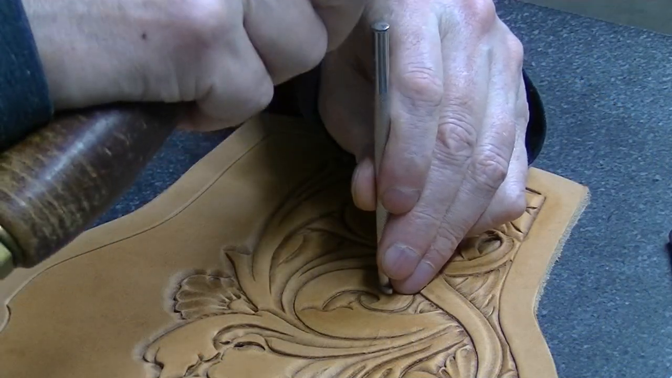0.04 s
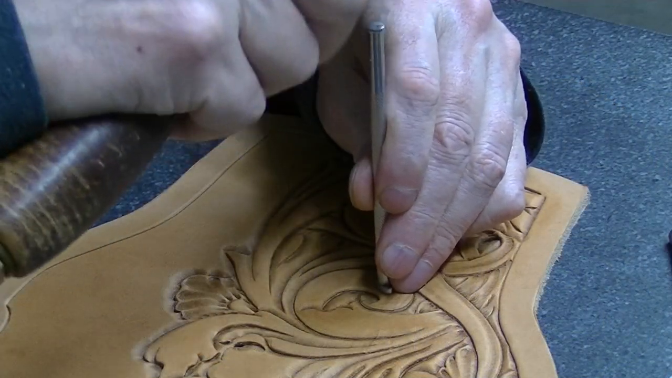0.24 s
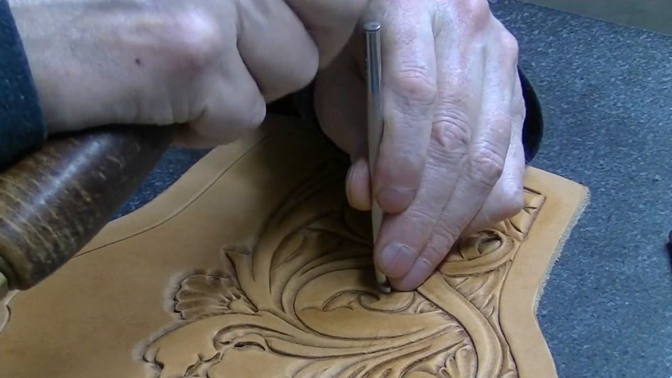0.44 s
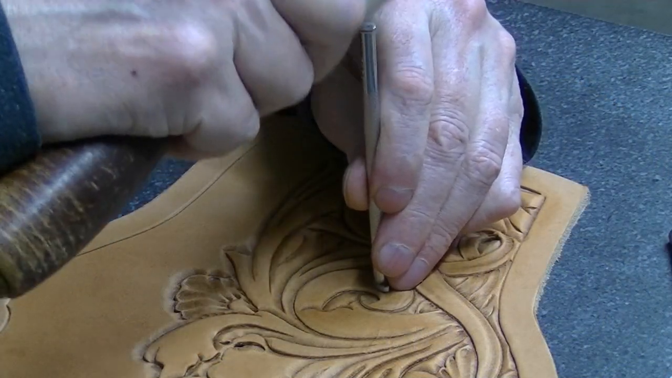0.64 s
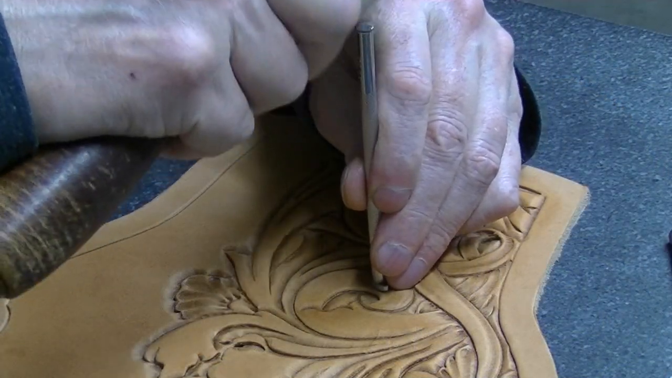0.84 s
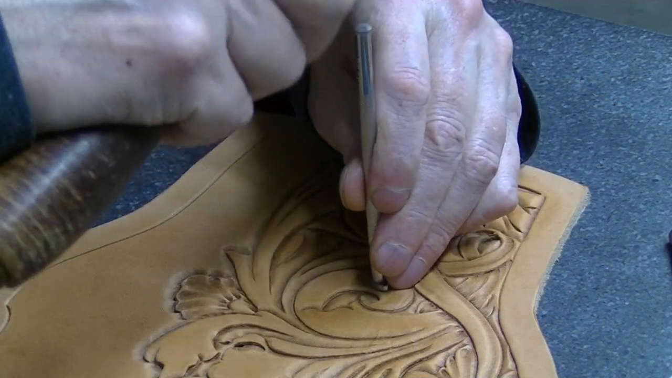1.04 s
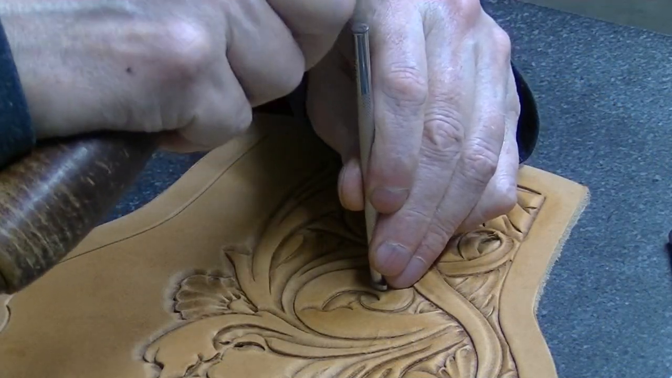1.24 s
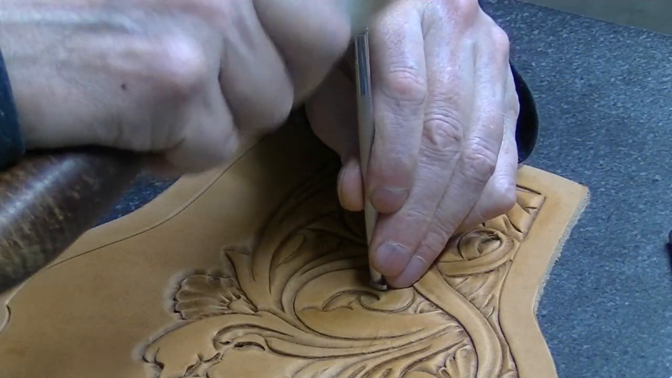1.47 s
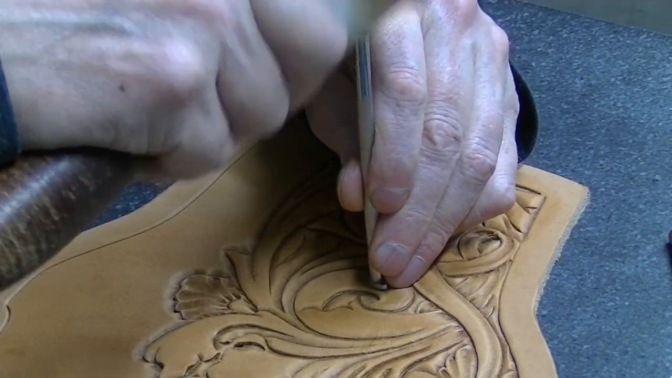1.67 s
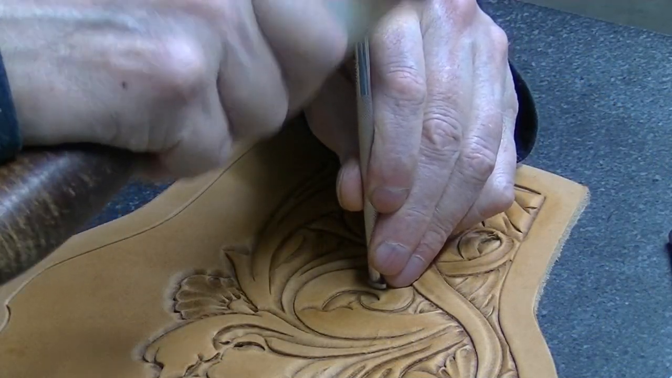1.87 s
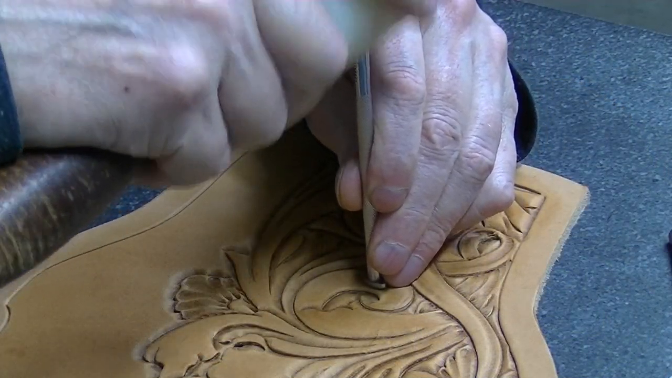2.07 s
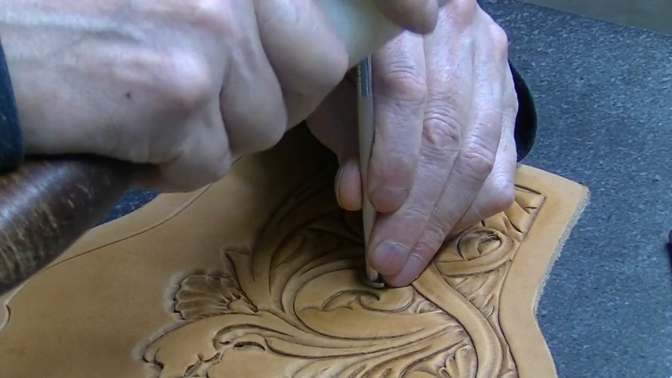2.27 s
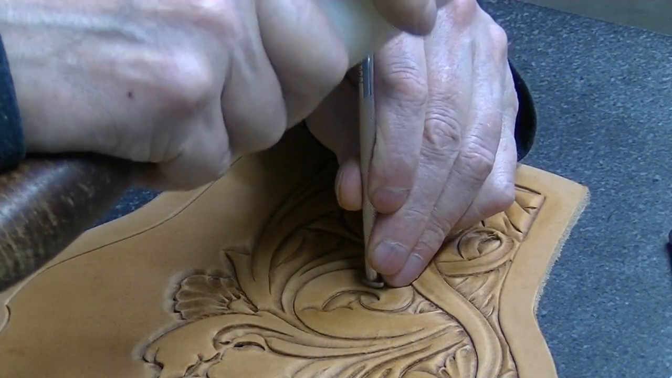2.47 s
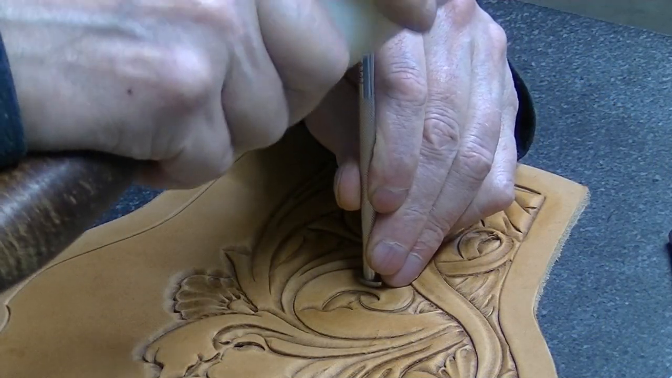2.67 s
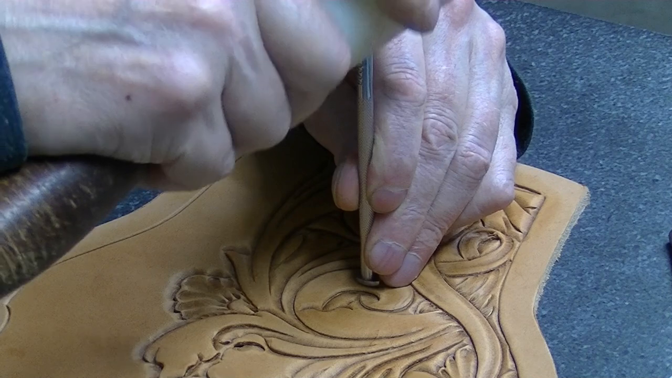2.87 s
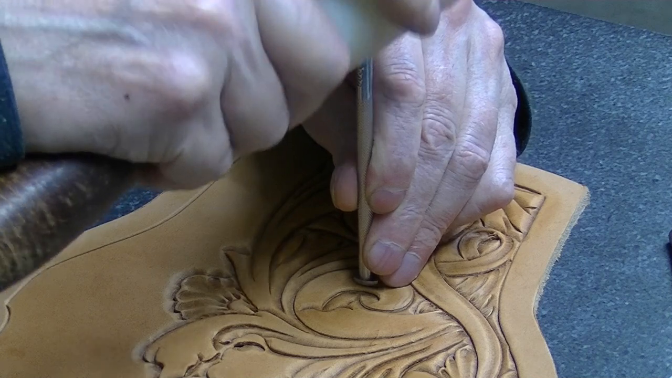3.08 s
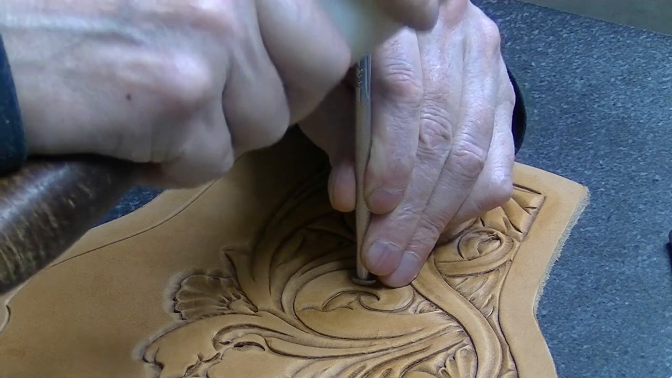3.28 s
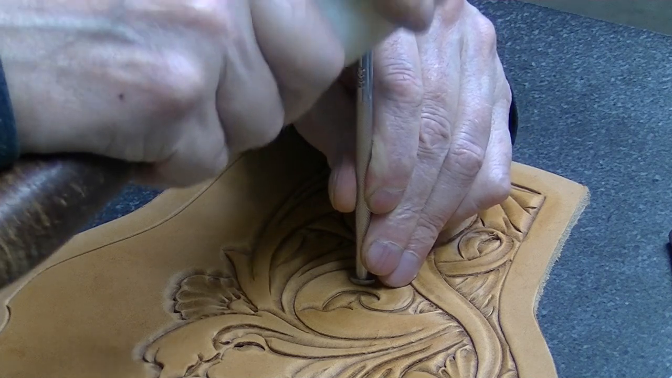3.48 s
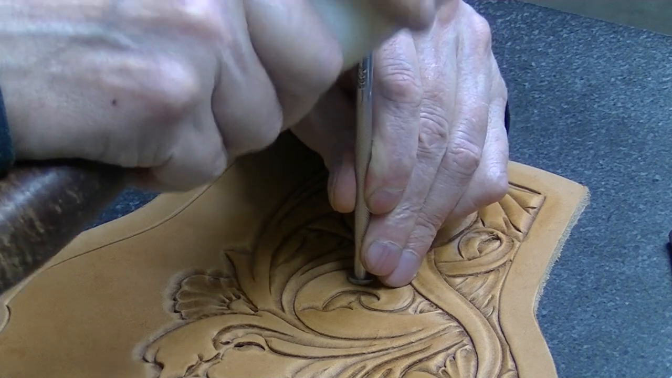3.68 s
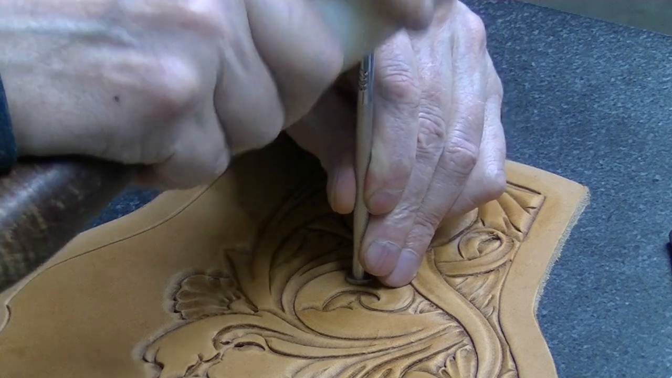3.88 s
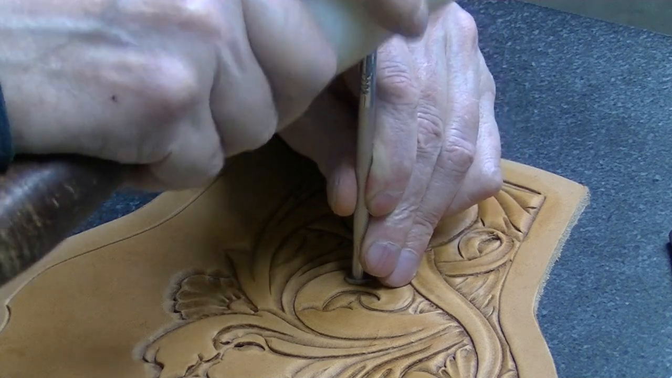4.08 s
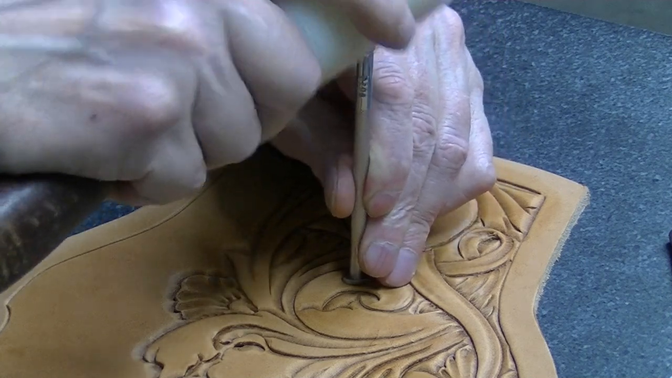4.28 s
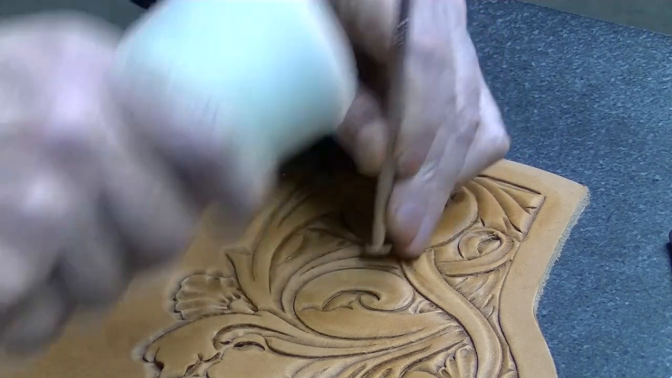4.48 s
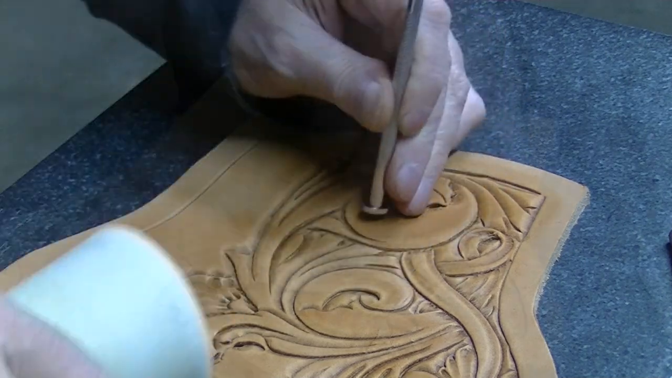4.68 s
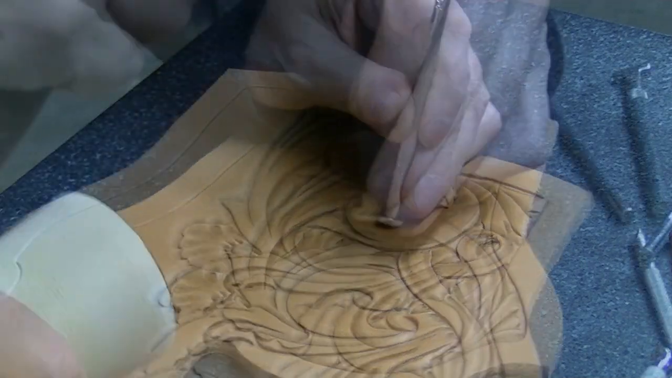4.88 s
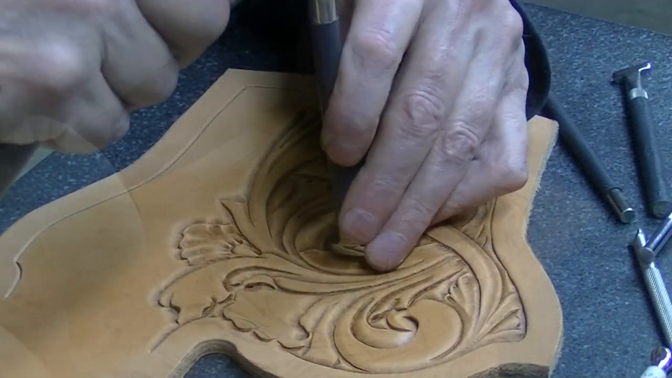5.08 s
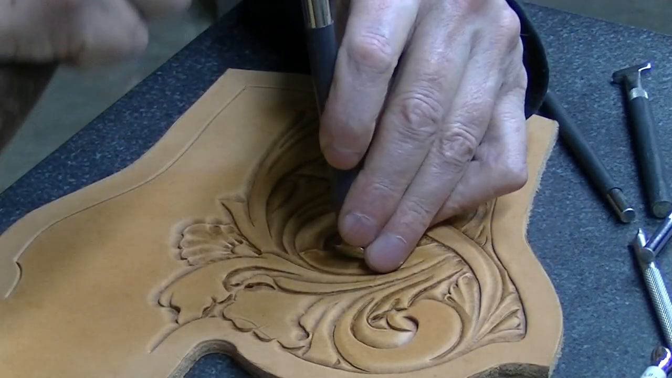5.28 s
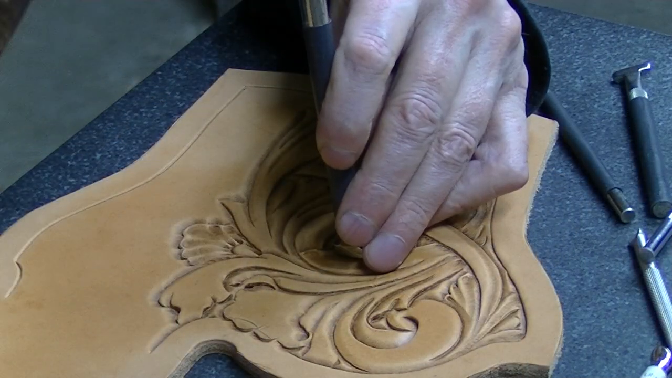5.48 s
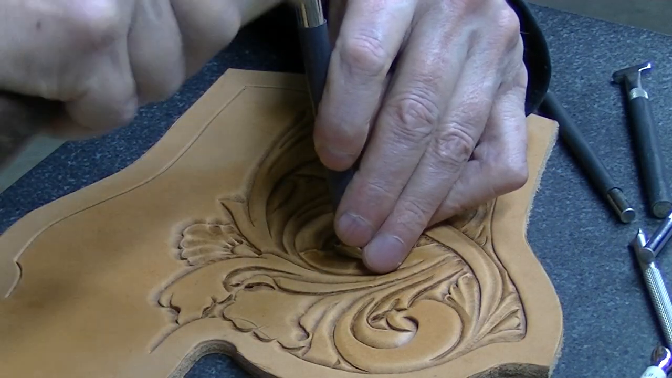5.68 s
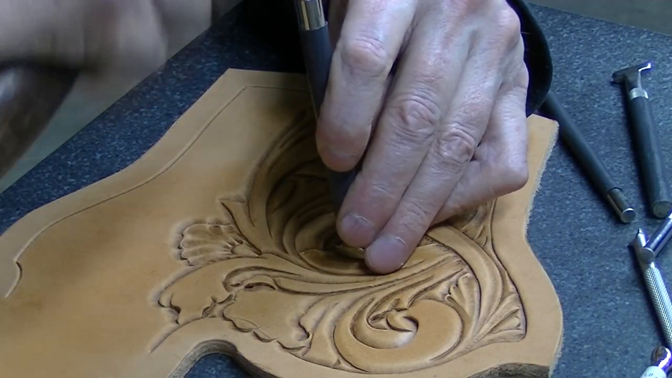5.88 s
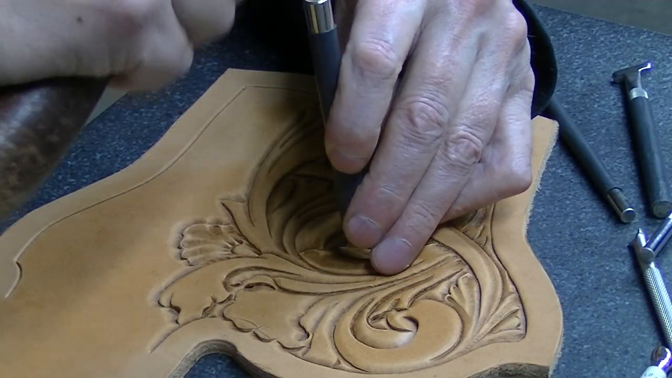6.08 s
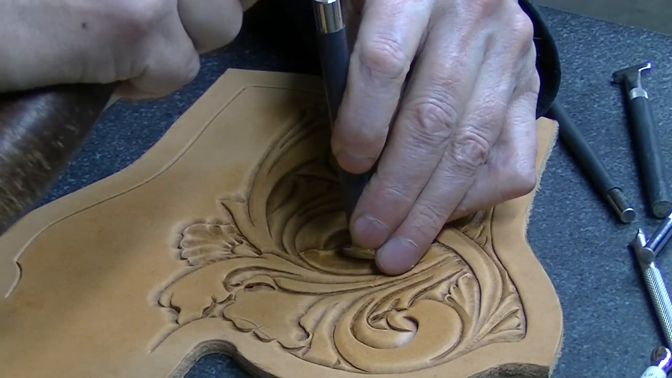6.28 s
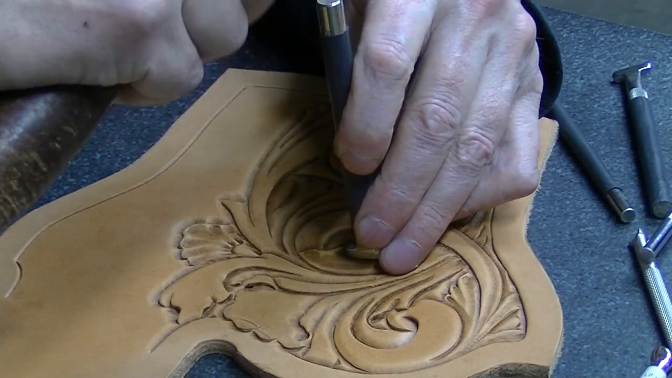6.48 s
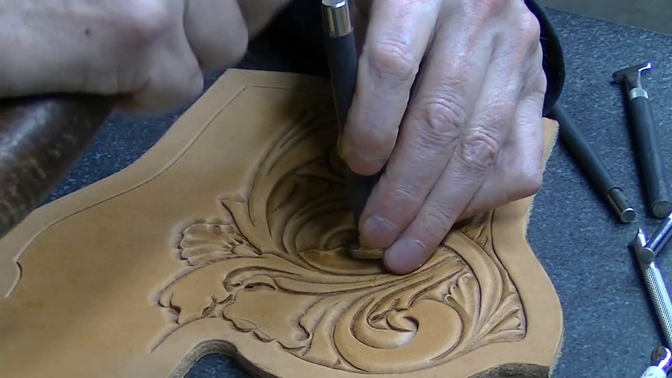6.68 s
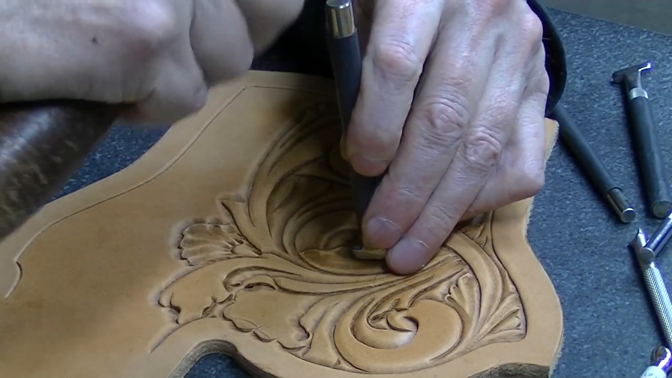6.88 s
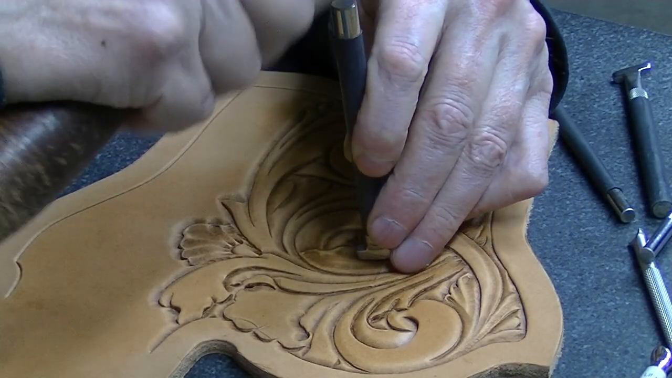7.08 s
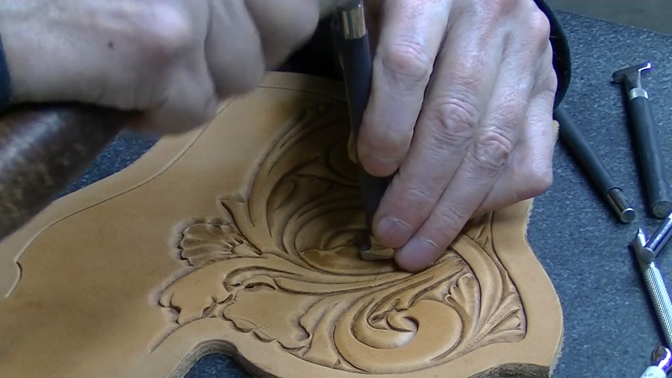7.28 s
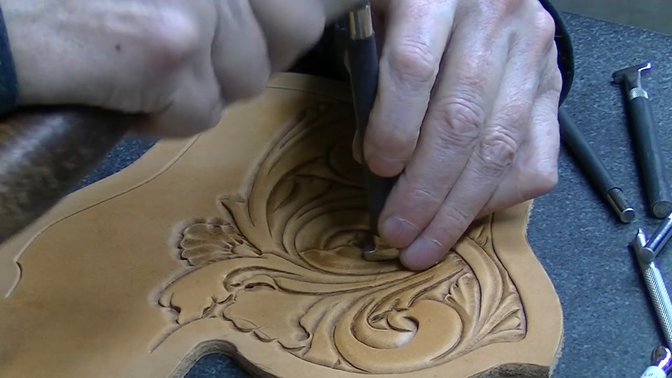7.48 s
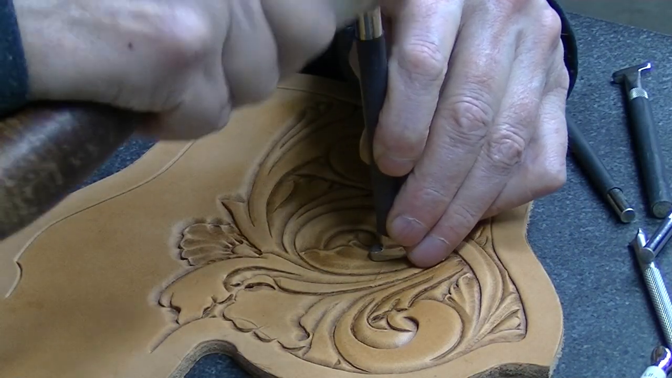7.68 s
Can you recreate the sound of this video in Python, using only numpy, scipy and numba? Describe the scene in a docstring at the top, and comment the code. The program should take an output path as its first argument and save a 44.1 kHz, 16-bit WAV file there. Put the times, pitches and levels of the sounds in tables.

```python
"""A small, bare workshop with a leather carver at the bench: a plastic mallet taps a slim steel stamp in an
even run, then, after a pause, hits a broader one harder. Damped sines ring stamp, mallet head and bench;
noise bursts crack and crunch; echoes, a diffuse tail and low standing waves make the room.
Far off, a machine hums in two wavering tones; near by lie room air, a sliding hand and light touches.
The camera's limiter ducks on loud clacks, then lets the room rise as its gain creeps back."""
import sys
import numpy as np
from scipy import signal
from scipy.fft import rfft, irfft, next_fast_len
from scipy.io import wavfile
from numba import njit

SR = 44100
rng = np.random.default_rng(int(sys.argv[2]) if len(sys.argv) > 2 else 0)


def bounce(signal):
    """Save signal as a 16-bit WAV file at the path given by the first command-line argument."""
    frames = np.transpose(np.atleast_2d(signal))
    limited = np.clip(frames, -1, 1)
    pcm = np.round(limited * 32767).astype(np.int16)
    wavfile.write(sys.argv[1], SR, pcm)


N = 341334
LEAD = SR // 4  # a quarter second of run-up, cut off at the end
TOTAL = N + LEAD
TIME = (np.arange(TOTAL) - LEAD) / SR  # s
AGE = np.arange(int(.7 * SR)) / SR  # s since an impact

# All levels in these tables are relative; each sound is trimmed further where it is mixed.
# blows on the slim stamp, the first just before the start:
# [t/s, force level/dB, crack level/dB, gripped shank f/Hz]
SLIM_TAPS = [(-0.055, -9.5, -30, 2310), (0.1549, -11, -40, 2120), (0.3566, -9, -17, 2330),
             (0.562, -10, -25, 2240), (0.7616, -12.5, -19, 2160), (0.9514, -10, -16, 2400),
             (1.1496, -7.5, -14, 2720), (1.3474, -9.5, -23, 2360), (1.5351, -9, -18.5, 2630),
             (1.7273, -10, -28, 2560), (1.9225, -10.5, -21, 2320), (2.1128, -11.5, -23, 2260),
             (2.2993, -12, -19, 2230), (2.4965, -11.5, -28, 2390), (2.6937, -12, -20, 2200),
             (2.8844, -11.5, -8, 2350), (3.078, -11.5, -11.5, 2350), (3.2768, -11.5, -17.5, 2290),
             (3.472, -11.5, -35, 2700), (3.6595, -12, -16, 2710), (3.8524, -11, -28, 2650),
             (4.0445, -11.5, -13, 2800), (4.2368, -11.5, -10, 2500)]
# blows on the broad stamp: [t/s, force level/dB, crack level/dB, gripped shank f/Hz]
BROAD_TAPS = [(5.6953, -4, 5, 2070), (5.9468, -2.5, 2.5, 2730), (6.1665, -3.5, -10, 2660),
              (6.3814, -7.5, -14, 2240), (6.5997, -7, -6, 2250), (6.8138, -6.5, -4, 2240),
              (7.0247, -8.5, -39, 2160), (7.2362, -8, -8, 2220), (7.4483, -10, -8, 2000),
              (7.6538, -8, 0, 2020)]
# modes of each stamp pressed on the leather, varied a little per blow: [f/Hz, level/dB, t60/s]
SLIM_STAMP = [(920, -10, 0.014), (1162, -9.5, 0.011), (1635, -10.5, 0.012), (2730, -24, 0.0044),
              (3996, -20, 0.0085), (4700, -15.5, 0.0065), (6400, -28.5, 0.015)]
BROAD_STAMP = [(902, -5, 0.0092), (1240, -1.5, 0.0054), (1730, -9, 0.0066), (2500, -25, 0.0014),
               (3540, -5.5, 0.0041), (5640, -8, 0.0016), (10300, -17, 0.0041)]
# spectrum of the crack of hard contact: [f/Hz, level/dB]
CRACK = [(600, -27), (2500, 5), (4500, 9.5), (7500, -10.5), (9800, -1.5), (12500, -8), (16000, -24)]
# spectrum of damp leather giving way: [f/Hz, level/dB]
CRUNCH = [(250, -22), (550, -15.5), (900, 1), (1700, 1), (2800, 6), (5500, -16), (9000, -31.5),
          (16000, -31.5)]
# modes of the mallet head, detuned a little per blow: [f/Hz, level/dB, t60/s]
HEAD = [(2151, 0.5, 0.031), (2422, 2, 0.009), (3810, 4, 0.042), (4505, -6, 0.015)]
# modes of bench and slab under the leather: [f/Hz, level/dB, t60/s]
BENCH = [(194.7, 1.5, 0.15), (260.2, 3.5, 0.074), (336.3, 11.5, 0.029), (463.6, 1.5, 0.033)]
# strong single echoes from near surfaces: [delay t/s, level/dB]
ECHOES = [(.0076, -18.5), (.0087, -13), (0.0188, -22), (0.0195, -24.5)]
# diffuse room sound: [f/Hz, level/dB, t60/s]
ROOM = [(60.6, -16, .5), (140, 16.5, 0.33), (368, 10.5, 0.58), (983, -1, 0.52), (2090, -2, 0.44),
        (3900, -3.5, 0.47), (7100, 2, 0.37), (14000, -3, 0.24)]
# standing waves of the workshop: [f/Hz, level/dB, t60/s]
ROOM_MODES = [(68.2, 8, 0.46), (98.7, -14.5, 0.72), (132.8, -5.5, 0.3), (172.2, 5, 0.44),
              (191.1, 4.5, 0.13), (218.2, -7, 0.68), (240, -17, 0.125), (281.4, -5.5, 0.71),
              (332.7, -12, 0.16), (395.4, -8.5, 0.19)]
# low tone of the distant machine: [t/s, level/dB]
HUM = [(0.0, -48), (0.06, -44.5), (2.39, -56.5), (2.42, -64), (3.5, -53), (4.77, -55), (5.3, -91)]
# one swell of the machine's upper tone: [centre t/s, length t/s, level/dB]
HUM_SWELL = (4.54, 0.71, -49.5)
# spectrum of the room air: [f/Hz, level/dB per Hz]
AIR = [(15, -27), (40, -11.5), (110, -6.5), (180, -12), (260, -10), (410, -16.5), (600, -21), (1600, -23),
       (2800, -32), (8000, -42), (14000, -41), (16000, -37)]
# the hand shifting over the leather: [centre t/s, length t/s, level/dB]
SLIDES = [(4.5, .3, -63), (4.9, .28, -63.5)]
# light touches of stamp and fingers: [t/s, level/dB, low edge f/Hz, high edge f/Hz]
TOUCHES = [(4.43, -58, 2000, 7060), (4.734, -32, 560, 1620), (5.486, -59, 2500, 14000)]
# the sound sits a little to the right: [f/Hz, left minus right level/dB]
BALANCE_DB = [(60, -2), (170, -3), (350, -4.2), (700, -3.6), (1400, -2), (2800, -1.4), (5000, -.4)]


def undb(db):
    """Decibels to gain."""
    return 10 ** (np.asarray(db) / 20)


def fade(t60, t):
    """Exponential decay, 60 dB down after t60."""
    return np.exp(-np.log(1000) * t / t60)


def colour(x, points):
    """Filter by a spectrum of (Hz, dB) points, joined along log frequency."""
    hz, db = np.transpose(points)
    n = next_fast_len(x.shape[-1])
    f = np.maximum(np.fft.rfftfreq(n, 1 / SR), 1)
    gain = undb(np.interp(np.log(f), np.log(hz), db))
    return irfft(rfft(x, n) * gain, n)[..., :x.shape[-1]]


def stereo_noise(size, width):
    """Two noises that are most alike in the bass and part towards the treble."""
    mid, side = rng.standard_normal((2, size))
    side = width * colour(side, [(150, -8.5), (1200, -3), (3000, 1.5)])
    return np.array([mid + side, mid - side])


def add(track, s, sound):
    """Mix a sound in at time s."""
    start = LEAD + int(round(s * SR))
    track[start:start + len(sound)] += sound[:TOTAL - start]


def ring(modes, t):
    """Damped sines of a struck body; neighbouring modes start in opposite directions."""
    total = 0
    for k, (hz, db, t60) in enumerate(modes):
        total = total + (-1) ** k * undb(db) * np.sin(2 * np.pi * hz * t) * fade(t60, t)
    return total


def burst(spectrum, decay_s, t):
    """Dense contact noise: micro-slips fall differently each time, the colour stays the same."""
    grains = rfft(rng.standard_normal(len(t)) * fade(decay_s, t))
    # keep only the random phases, so that every burst has the same flat spectrum to colour
    flat = grains / abs(grains) * np.sqrt(np.mean(abs(grains) ** 2))
    even = irfft(flat, len(t))
    return colour(even, spectrum) * fade(2 * decay_s, t) * np.sqrt(2)


def blows(taps, stamp, clack_db, bite_s, bite_db, shank_db, shank_t60, low_ring_db, high_ring_db,
          high_loss_db_per_hz, crack_db, crack_decay_s, crunch_db, crunch_decay_s, thump_db, push_s):
    """Mallet blows excite stamp and leather (clack), mallet head and shank (head), and the bench (push)."""
    clack, head, push = np.zeros((3, TOTAL))
    t = AGE[:SR // 12]
    # the same stamp on the same patch of leather gives way much alike each time
    patch = burst(CRUNCH, crunch_decay_s, t)
    for s, force_db, edge_db, shank_hz in taps:
        # the seat of the stamp changes a little from blow to blow
        seat = rng.standard_normal((len(stamp), 2))
        seated = [(hz * (1 + .0075 * a), db + .5 * b, t60) for (hz, db, t60), (a, b) in zip(stamp, seat)]
        steel = ring(seated, t)
        crack = undb(crack_db + edge_db) * burst(CRACK, crack_decay_s, t)
        crunch = undb(crunch_db) * (2 * patch + burst(CRUNCH, crunch_decay_s, t)) / np.sqrt(5)
        clack_gain = undb(force_db + clack_db)
        add(clack, s, clack_gain * (steel + crack))
        # a moment later the stamp bottoms out in the leather
        add(clack, s + bite_s, clack_gain * (undb(bite_db) * steel + crunch))

        # the grip tunes the shank: above 2400 Hz it starves the head's high modes
        high_db = high_ring_db - high_loss_db_per_hz * max(shank_hz - 2400, 0)
        detune = 1 + .003 * rng.standard_normal()
        face = []
        for hz, db, t60 in HEAD:
            speak_db = np.interp(hz, [2400, 3700], [low_ring_db, high_db])
            face.append((hz * detune, db + speak_db, t60))
        # the fingers damp the shank at once
        shank = ring([(shank_hz, shank_db, shank_t60)], t)
        add(head, s, undb(force_db) * (ring(face, t) + shank))

        # a shorter push reaches higher bench modes
        shove = t * np.exp(-t / push_s)
        add(push, s, undb(force_db + thump_db) * shove / shove.sum())
    return np.array([clack, head, push])


def convolve(x, response):
    """Play a track through a mono or stereo response."""
    return signal.fftconvolve(x[None], np.atleast_2d(response), axes=1)[:, :TOTAL]


def diffuse_room(width, onset_s):
    """Half-octave bands of dense reflections, each dying at its own pace."""
    hz, db, t60 = np.transpose(ROOM)
    f = np.log2(np.maximum(np.fft.rfftfreq(len(AGE), 1 / SR), 1))
    spectrum = rfft(stereo_noise(len(AGE), width))
    tail = 0
    for octave in np.arange(5.5, 14.6, .5):  # log2 of the band centre in Hz
        part = irfft(spectrum * np.maximum(1 - 2 * abs(f - octave), 0), len(AGE))
        level = undb(np.interp(octave, np.log2(hz), db))
        tail = tail + part * level * fade(np.interp(octave, np.log2(hz), t60), AGE)
    # silent until half of onset_s, full at one and a half
    return tail * np.clip(AGE / onset_s - .5, 0, 1)


def workshop(clack, head, push, room_db, head_room_db, thud_db, thud_room_db, boom_db, boom_delay_s):
    """Direct sound, near echoes, diffuse tail, and the low boom that comes back from the walls."""
    thud = colour(convolve(push, ring(BENCH, AGE))[0], [(35, -13.5), (95, 0)])
    near = np.zeros(len(AGE))
    near[0] = 1  # the direct path
    for delay_s, db in ECHOES:
        near[int(delay_s * SR)] += undb(db)
    late = np.maximum(AGE - boom_delay_s, 0)
    boom = -sum(ring([mode], late) for mode in ROOM_MODES)
    # below its lowest standing waves the room gives almost nothing back
    boom = colour(boom, [(50, -69), (85, -2.0), (120, 0)])
    # the mallet head radiates sideways, so it is heard mostly by way of the walls
    sent = clack + undb(head_room_db) * head + undb(thud_room_db) * thud
    tail = convolve(sent, diffuse_room(width=.55, onset_s=.005))
    direct = convolve(clack + head + undb(thud_db) * thud, near)
    return direct + undb(room_db) * tail + undb(boom_db) * convolve(push, boom)


def swell(s, length_s, db):
    """A smooth rise and fall around time s; length_s is its width at 1/e of the peak."""
    return undb(db) * np.exp(-(2 * (TIME - s) / length_s) ** 2)


def hum(low_hz, upper_hz, hum_db):
    """A far machine: its low tone fades out between about 4.8 and 5.3 s, its upper tone swells once; both waver
    in pitch."""
    s, db = np.transpose(HUM)
    low_gain = undb(np.interp(TIME, s, db) + hum_db)
    out = 0
    for hz, gain in (low_hz, low_gain), (upper_hz, swell(*HUM_SWELL)):
        waver = np.interp(TIME, np.linspace(0, N / SR, 16), rng.standard_normal(16))
        phase = 2 * np.pi * np.cumsum(hz + .5 * waver) / SR
        out = out + gain * np.sin(phase)
    return out


def room_air(air_db):
    """Steady air of the room, as wide, coloured noise."""
    air = colour(stereo_noise(TOTAL, width=0.99), AIR)
    return undb(air_db) * air / air.std()


def hand_slides():
    """Skin sliding over leather hisses: coloured noise that rises and falls."""
    hiss = [(500, 5.5), (2000, 3), (7000, -3.5), (12500, 0), (16000, -8)]  # f/Hz, level/dB
    slide = colour(stereo_noise(TOTAL, width=0.48), hiss)
    return sum(swell(*row) for row in SLIDES) * slide / slide.std()


def band(x, lo_hz, hi_hz):
    """Causal band-pass."""
    edges = [lo_hz, min(hi_hz, SR / 2 - 1000)]
    return signal.sosfilt(signal.butter(2, edges, "band", fs=SR, output="sos"), x)


def touches(t60):
    """Soft, short contacts while the stamp is changed: fading noise in a band."""
    track = np.zeros(TOTAL)
    for s, db, lo_hz, hi_hz in TOUCHES:
        contact = rng.standard_normal(len(AGE)) * fade(t60, AGE)
        add(track, s, undb(db) * band(contact, lo_hz, hi_hz))
    return track


def scene():
    """Both runs of blows in the workshop, over its quiet background."""
    slim = blows(SLIM_TAPS, SLIM_STAMP, clack_db=4, bite_s=.0006, bite_db=-8.0, shank_db=-8,
                 shank_t60=0.0099, low_ring_db=-19.0, high_ring_db=-18.0, high_loss_db_per_hz=0.06,
                 crack_db=-6.5, crack_decay_s=0.019, crunch_db=-2.5, crunch_decay_s=0.019,
                 thump_db=1.5, push_s=0.00034)
    broad = blows(BROAD_TAPS, BROAD_STAMP, clack_db=4, bite_s=0.000825, bite_db=-3, shank_db=-5.0,
                  shank_t60=0.011, low_ring_db=-6.5, high_ring_db=-12.5, high_loss_db_per_hz=0.16,
                  crack_db=-4.5, crack_decay_s=0.018, crunch_db=-0.5, crunch_decay_s=.012,
                  thump_db=0, push_s=0.00014)
    clack, head, push = slim + broad
    work = workshop(clack + touches(t60=0.029), head, push, room_db=-40.5, head_room_db=11, thud_db=-22,
                    thud_room_db=-21.5, boom_db=-20, boom_delay_s=0.01692)
    machine = hum(low_hz=59.2, upper_hz=74.8, hum_db=4.5)
    left, right = work + machine + room_air(air_db=-56.5) + hand_slides()
    # half of the balance goes to each side
    left = colour(left, [(hz, db / 2) for hz, db in BALANCE_DB])
    right = colour(right, [(hz, -db / 2) for hz, db in BALANCE_DB])
    return np.array([left, right])


@njit
def follow(x, attack, release):
    """Peak follower that rises fast and sinks slowly."""
    out, e = np.empty(len(x)), 0.
    for i in range(len(x)):
        e += (x[i] - e) * (attack if x[i] > e else release)
        out[i] = e
    return out


def limiter(x, top_db, attack_s, release_s, ceiling):
    """The gain drops on peaks above top_db and creeps back; what slips through is rounded off."""
    attack = 1 - np.exp(-1 / (attack_s * SR))
    release = 1 - np.exp(-1 / (release_s * SR))
    peak = follow(abs(x).max(axis=0), attack, release)
    held = x / np.maximum(peak / undb(top_db), 1)
    return ceiling * np.tanh(held / ceiling)


def record(dry):
    """The camera sheds the deepest bass, limits the peaks and cuts the top."""
    thin = signal.sosfilt(signal.butter(2, 42, "high", fs=SR, output="sos"), dry)
    held = limiter(thin, top_db=-9, attack_s=0.000095, release_s=0.047, ceiling=0.37)
    soft = signal.sosfilt(signal.butter(2, 12500, fs=SR, output="sos"), held)
    # a steep edge at 15.2 kHz
    return signal.sosfilt(signal.ellip(8, .2, 70, 15200, fs=SR, output="sos"), soft)[:, LEAD:]


dry = scene()
out = record(dry)
bounce(out)
```